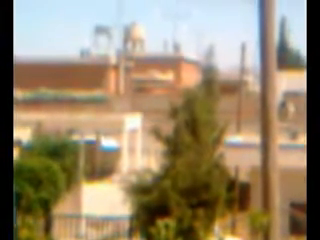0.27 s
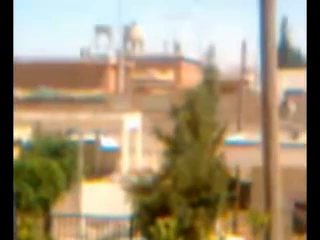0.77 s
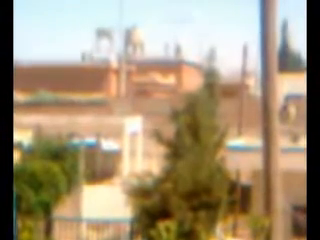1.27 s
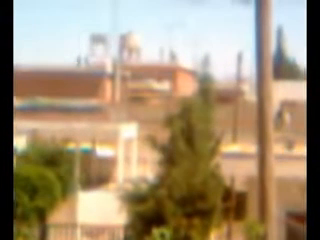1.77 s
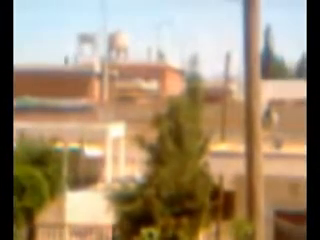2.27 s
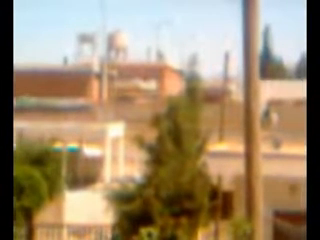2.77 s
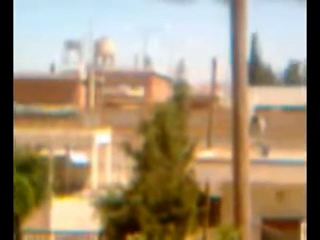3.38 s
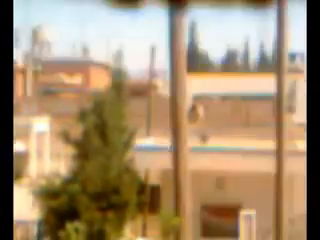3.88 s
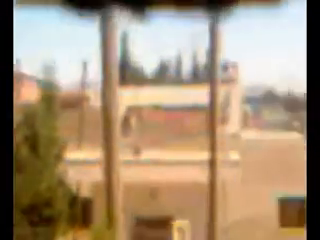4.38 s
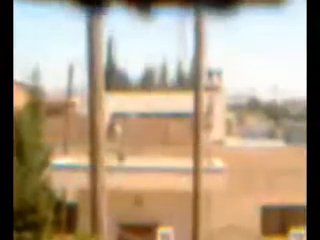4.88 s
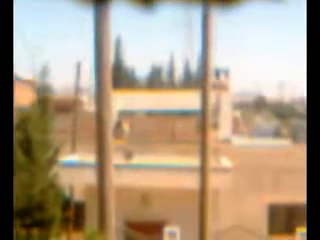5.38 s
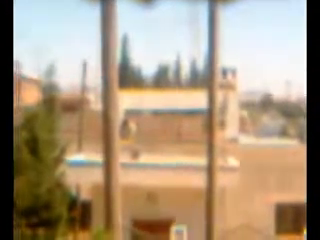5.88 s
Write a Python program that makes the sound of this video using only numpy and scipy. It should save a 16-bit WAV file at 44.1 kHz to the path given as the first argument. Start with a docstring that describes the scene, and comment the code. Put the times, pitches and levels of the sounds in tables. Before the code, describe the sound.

A long burst of rapid machine-gun fire cracks and rattles off town houses, its echo rolling away before four single rifle shots, through a phone.

```python
"""In the streets of a town, a machine gun fires one long burst; four single rifle shots follow.
Each bullet's supersonic crack is a sharp pulse that rattles off nearby houses as a swarm of reflections.
The duller muzzle report, pulses and echoes too, follows about a tenth of a second later.
The streets add a long rolling tail of decaying noise taps, over a faint steady wash of coloured noise.
A phone with a limiter and a coarse sample rate takes it all in."""
import sys
import numpy as np
from scipy import signal
from scipy.io import wavfile
from scipy.ndimage import uniform_filter1d, minimum_filter1d

SR = 44100
rng = np.random.default_rng(int(sys.argv[2]) if len(sys.argv) > 2 else 0)


def waveform_to_disk(signal):
    """Save audio, clipped to [-1, 1], as 16-bit WAV at the path in sys.argv[1]."""
    frames = np.transpose(np.atleast_2d(signal))
    scaled = np.clip(frames, -1, 1) * 32767
    samples = np.round(scaled).astype(np.int16)
    wavfile.write(sys.argv[1], SR, samples)


N = 269451

# rounds of the burst, as each bullet passes: (time [s], direct crack level before the front's boost [dB])
BURST_ROUNDS = [(0.0005, -2.5), (0.1181, -8.5), (0.2249, -6.5), (0.3238, -10), (0.4341, -11), (0.5499, -14),
                (0.6493, -6), (0.7618, -10.5), (0.8577, -9.5), (0.9611, -12), (1.0544, -7.5), (1.169, -10),
                (1.2717, -10.1), (1.3716, -12.5), (1.4819, -13.5), (1.5837, -11), (1.6896, -11.3),
                (1.81, -17), (1.9017, -14), (2.018, -14.5), (2.1195, -15.5), (2.2319, -16.5),
                (2.3472, -10.5), (2.4527, -10.5), (2.5515, -7.5), (2.6532, -9.5), (2.7605, -8.5),
                (2.8641, -7), (2.955, -3.5), (3.0562, -7.5), (3.1474, -13), (3.256, -11.5), (3.3481, -11.5),
                (3.4366, -12.5), (3.529, -9.5), (3.625, -13.5), (3.7097, -13), (3.8245, -13), (3.9395, -6),
                (4.053, -5.5), (4.1675, -9.5), (4.2867, -11), (4.4045, -14)]


def bullets(front_boost_db=4):
    """Shock wave and early reflections: a sharp front, then a longer swarm from the house fronts."""
    # closely spaced arrivals of the shock: (delay [s], level [dB])
    front_paths = [(0, -4.5), (.00087, -3.5), (.00174, -3), (.0026, -4)]
    # spectrum of the shock front: (frequency [Hz], relative level [dB])
    front_colour = [(40, -39.5), (250, -22.5), (700, -19.5), (1200, -12.5), (1800, -3), (2300, -0.5),
                    (2650, -15), (3000, -14), (3500, -32), (4000, -33.5)]
    # outline of the swarm off the houses: (delay [s], level [dB])
    echo_outline = [(.004, -4), (0.013, -3.5), (0.016, 5), (.026, 2), (.042, -5), (0.055, -9.5),
                    (.072, -14.5), (.12, -19)]
    # spectrum of that swarm: (frequency [Hz], relative level [dB])
    echo_colour = [(40, -34.5), (250, -26.5), (700, -22), (1000, -22.5), (1400, -14), (1800, -9),
                   (2150, -4), (2400, -5.5), (2700, -10), (3000, -17.5), (3500, -26), (4000, -36)]
    # level of the house echoes along the burst: (time [s], level [dB])
    house_level = [(0, -7.5), (1.45, -8.5), (1.75, -11.6), (2.3, -8.6), (3.6, -8), (4.4, -8.5)]

    passing, crack_db = np.transpose(BURST_ROUNDS)
    echo_db = np.interp(passing, *np.transpose(house_level))
    front = direct(passing, crack_db + front_boost_db, front_paths, front_colour,
                   length=.0018, jitter=.00005)
    swarm = arrivals(passing, echo_db, echo_outline, echo_colour, paths_per_s=1500, same=.3)
    return front + swarm


def muzzle():
    """Blast wave trailing the shock: clean bass bounces, scattered midrange, and far-wall echoes."""
    # lag of each report behind its crack, drifting as the aim swings: (time [s], lag [s])
    report_lag = [(0, 0.1), (.86, 0.11), (1.25, 0.097), (1.7, 0.085), (2.2, 0.076), (2.42, 0.076),
                  (2.87, 0.074), (3.06, 0.081), (3.26, .096), (3.53, 0.12), (3.95, 0.14), (4.4, 0.13)]
    # bounces of the bass thump: (delay [s], level [dB])
    thump_paths = [(0, 1), (.0068, 2), (0.0158, -5.5), (0.032, -6.5), (0.0339, -2), (0.0417, -10.5),
                   (0.052, -10.5)]
    # spectrum of the thump: (frequency [Hz], relative level [dB])
    thump_colour = [(20, -30.5), (45, -22), (85, -12.5), (150, -14.5), (215, 0.5), (285, 3.5), (370, -2.5),
                    (460, -7), (600, -17), (1200, -23.5), (2400, -33.5), (4000, -75)]
    # outline of the midrange bark's swarm: (delay [s], level [dB])
    bark_outline = [(0, 6), (.003, -3.5), (.007, 0.5), (.0095, 3), (.018, -2.5), (.034, -5), (.045, -14.5),
                    (0.068, -18.5)]
    # spectrum of the bark: (frequency [Hz], relative level [dB])
    bark_colour = [(100, -42.5), (400, -9), (600, -8), (780, -12), (1000, -1.5), (1300, -2.5), (2000, -3),
                   (2600, -17), (3200, -12), (4000, -34.5)]
    # far-wall echo level along the burst: (time [s], level [dB])
    wall_level = [(0, -24.5), (1.5, -27), (2.1, -22.5), (2.8, -21.5), (3.5, -25), (4.15, -34), (4.4, -25.5)]
    # clean, hollow thud off one broad wall: (delay [s], level against the wall level [dB])
    thud_paths = [(0.0313, -0.5)]
    # spectrum of the thud: (frequency [Hz], relative level [dB])
    thud_colour = [(100, -31.5), (200, -14.5), (275, -5), (325, 2.5), (385, -8), (520, -18), (900, -36.5),
                   (4000, -60.5)]
    # outline of the scattered far-wall swarm: (delay [s], level [dB])
    wall_outline = [(.018, -6.5), (0.03, 9.5), (0.043, -3.5), (0.057, -2), (0.081, -9.5), (.13, -20.5)]
    # spectrum of the scattered swarm: (frequency [Hz], relative level [dB])
    wall_colour = [(20, -42), (80, -11), (170, -13.5), (300, -3), (450, -6), (700, -26.5), (1100, -21),
                   (2200, -13), (3000, -30.5), (4000, -30.5)]
    usual_lag_s = 0.11
    earlier_round_s = -.101  # a bullet already gone by, whose report is still on its way
    # levels at the usual lag, and losses per second of extra lag
    thump_usual_db, thump_loss_db_per_s = -22, 101
    bark_usual_db, bark_loss_db_per_s = -14.5, 334.5
    wall_scatter_db = -2.5  # scattered echo against the wall level

    passing = np.append(earlier_round_s, np.array(BURST_ROUNDS)[:, 0])
    lag = np.interp(passing, *np.transpose(report_lag))
    heard, extra = passing + lag, lag - usual_lag_s
    thump_db = thump_usual_db - thump_loss_db_per_s * extra
    bark_db = bark_usual_db - bark_loss_db_per_s * np.maximum(extra, 0)
    wall_db = np.interp(passing, *np.transpose(wall_level))
    thump = direct(heard, thump_db, thump_paths, thump_colour, length=.009, jitter=.00015)
    bark = arrivals(heard, bark_db, bark_outline, bark_colour, paths_per_s=1400, same=0.16)
    thud = direct(heard, wall_db, thud_paths, thud_colour, length=0.016, jitter=.0007)
    scattered = arrivals(heard, wall_db + wall_scatter_db, wall_outline, wall_colour,
                         paths_per_s=680, same=.25)
    return thump + bark + thud + scattered


def rifles():
    """Echo delay and distance: near shots slap back at once, far ones patter back from distant blocks."""
    # shots close by: (time [s], direct level [dB], echo level [dB], midrange punch level [dB])
    near_shots = [(5.8065, -12, -11.5, -12), (6.0628, -14, -11.5, -23)]
    # shots farther off: (time [s], direct level [dB], echo level [dB], bright snap level [dB])
    far_shots = [(5.1388, -16, -24, -38), (5.4364, -18, -21, -21.5)]
    # first bounces of every shot: (delay [s], level [dB])
    shot_paths = [(0, -2), (.0008, -0.5), (.0016, -9.5), (.0026, 0.5), (.0034, -10), (.0042, -1.5),
                  (.0052, -5.5), (.0063, -2.5), (.0078, -14), (.0095, -2.5)]
    # outlines of the near and far swarms: (delay [s], level [dB])
    near_outline = [(.008, 7), (.014, -4), (.022, -1), (.026, -1.5), (.06, -10.5), (.08, -9.5),
                    (0.111, -16), (.22, -28)]
    far_outline = [(0.011, -2.5), (0.041, -8), (.046, -2), (.055, -11), (.085, -8.5), (.095, -7),
                   (.125, -10), (.163, -1), (.185, -9), (0.261, -15)]
    # spectra of near shots, their punch, far shots, their snap: (frequency [Hz], relative level [dB])
    near_colour = [(40, -39), (150, -18), (350, -16), (680, -16), (900, -9.5), (1250, -2.5), (1600, -1),
                   (2000, 4), (2500, -1.5), (3000, -13.5), (3500, -20), (4000, -29)]
    punch_colour = [(300, -25), (700, -10.5), (900, -1.5), (1350, 0), (1750, -6), (4000, -43)]
    far_colour = [(40, -30), (150, -12), (400, -4), (800, -4.5), (1300, 0.5), (1700, 1.5), (2150, 7),
                  (2600, -2.5), (3200, -16.5), (4000, -29.5)]
    snap_colour = [(40, -35), (1500, -21), (2500, 0), (3100, 9), (3500, -16), (4000, -23)]

    times, direct_db, echo_db, punch_db = np.transpose(near_shots)
    near = direct(times, direct_db, shot_paths, near_colour, length=0.0032, jitter=.0001)
    near += direct(times, punch_db, shot_paths, punch_colour, length=0.0021, jitter=.0001)
    near += arrivals(times, echo_db, near_outline, near_colour, paths_per_s=2600, same=.2)

    times, direct_db, echo_db, snap_db = np.transpose(far_shots)
    far = direct(times, direct_db, shot_paths, far_colour, length=0.0014, jitter=.0001)
    far += direct(times, snap_db, shot_paths, snap_colour, length=0.0016, jitter=.0001)
    far += arrivals(times, echo_db, far_outline, far_colour, paths_per_s=1100, same=.2)
    return near + far


def streets(dry_shots, build_up_s=0.036, echoes_per_s=1200, roll_db=2.0):
    """Late reverberation: scattered echoes build up, then decay in uneven waves, band by band."""
    # reverberation of the streets: (frequency [Hz], time to fall 60 dB [s], level [dB])
    street_bands = [(60, 4.3, -9), (300, 0.87, -9), (574, 1.7, -4), (1190, 2.8, -9), (2380, 1.92, -14),
                    (4100, 1.2, -8.5)]

    size = 2 * SR
    taps = rng.standard_normal(size) * (rng.random(size) < echoes_per_s / SR)
    hz, t, bands = signal.stft(taps / np.linalg.norm(taps), SR, nperseg=512)
    table = np.array(street_bands)
    t60 = read(table[:, :2], hz)[:, None]
    band_db = read(table[:, ::2], hz)[:, None]
    roll = uniform_filter1d(rng.standard_normal(len(t)), size=5)
    fade = gain_of(roll_db * roll / roll.std() - 60 * t / t60)
    fade *= 1 - np.exp(-(t / build_up_s) ** 2)
    fade /= np.sqrt(np.mean(fade ** 2, axis=1, keepdims=True))  # the band level alone sets the energy
    tail = signal.istft(bands * fade * gain_of(band_db), SR, nperseg=512)[1]
    return signal.fftconvolve(dry_shots, tail)[:N]


def air(level_db=-43):
    """Stationary filtered noise: the faint steady wash of the town."""
    # spectrum of the wash: (frequency [Hz], relative level [dB])
    air_colour = [(20, -20.5), (50, -28), (100, -17), (400, -6), (800, -17), (2100, 0), (3000, -7.5),
                  (4000, -27)]
    return gain_of(level_db) * signal.fftconvolve(rng.standard_normal(N), pulse(air_colour))[:N]


def direct(times, levels_db, paths, colour, length, jitter):
    """Specular reflection: a clean pulse and its bounces, whose timing wanders in the moving air."""
    delay, path_db = np.transpose(paths)
    wave = pulse(colour) * np.sqrt(length * SR)  # 0 dB is an RMS of 1 over this length [s]
    out = np.zeros(N)
    wander = jitter * rng.standard_normal((len(times), len(paths))) * (delay > 0)  # jitter [s]
    for s, level_db, shifts in zip(times, levels_db, wander):
        for late, bounce_db in zip(delay + shifts, path_db):
            add(out, s + late, wave * gain_of(level_db + bounce_db))
    return out


def arrivals(times, levels_db, outline, colour, paths_per_s, same):
    """Diffuse reflection: a swarm of paths; the share `same` comes off the same walls for every shot."""
    colour_scatter_db = 1.5  # each swarm takes other paths, and so another colour
    delay, outline_db = np.transpose(outline)
    t = np.arange(SR // 3) / SR
    inside = (t >= delay[0]) * (t <= delay[-1])
    strength = gain_of(np.interp(t, delay, outline_db)) * inside
    out, same = np.zeros(N), np.clip(same, 0, 1)
    standing = np.sqrt(same) * sparse_taps(len(t), paths_per_s)
    for s, level_db in zip(times, levels_db):
        varied = [(hz, band_db + colour_scatter_db * rng.standard_normal()) for hz, band_db in colour]
        wave = pulse(varied)
        taps = standing + np.sqrt(1 - same) * sparse_taps(len(t), paths_per_s)
        sound = signal.fftconvolve(taps * strength, wave)
        # the outline sets the energy, whatever taps were drawn
        gain = gain_of(level_db) * np.linalg.norm(strength) / (np.linalg.norm(sound) + 1e-9)
        add(out, s, sound * gain)
    return out


def sparse_taps(size, paths_per_s):
    """Random echo density: uneven gaps and signs; a few flat walls reflect much harder than the rest."""
    taps = np.zeros(size)
    gaps, signs, heights = rng.random((3, 2000))
    at = (np.cumsum(2 * gaps) * SR / paths_per_s).astype(int)
    values = np.sign(signs - .5) * (.5 - np.log(1 - heights))
    inside = at < size
    taps[at[inside]] = values[inside]
    return taps


def pulse(colour, size=2048):
    """Minimum phase: the causal pressure pulse, of energy 1, that has this spectral shape."""
    log_gain = np.log(gain_of(read(colour, abs(np.fft.fftfreq(size, 1 / SR)))))
    spectrum = np.exp(np.conj(signal.hilbert(log_gain)))  # phase from the log gain
    wave = np.fft.ifft(spectrum).real[:size // 2]
    return wave / np.linalg.norm(wave)


def read(points, hz):
    """Logarithmic frequency scale: values joined by straight lines over it."""
    f, value = np.transpose(points)
    return np.interp(np.log(hz + 1), np.log(f + 1), value)


def gain_of(db):
    """Level to amplitude ratio: 20 dB is a factor of ten."""
    return 10 ** (np.asarray(db) / 20)


def add(mix, s, sound):
    """Superposition: mixes a sound in at time s [s]; it may already be under way at time 0."""
    start = round(s * SR)
    sound = sound[max(0, -start):]
    part = mix[max(0, start):][:len(sound)]
    part += sound[:len(part)]


def scene(rifle_send_db=-2):
    """Linear superposition: the burst and the single shots share the same streets."""
    burst = bullets() + muzzle()
    singles = rifles()
    tail = streets(burst + gain_of(rifle_send_db) * singles)
    return (burst + singles + tail + air())[None]


def limiter(x, ceiling_db=0., size=36):
    """Peak limiting: turns the gain down for about a millisecond round each peak."""
    gain = (1 + (x / gain_of(ceiling_db)) ** 6) ** (-1 / 6)
    return x * uniform_filter1d(minimum_filter1d(gain, size), size)


def low_pass(x, hz):
    """Linear-phase filtering: a steep low-pass, centred so that it adds no delay."""
    return signal.oaconvolve(x, signal.firwin(511, hz, window=("kaiser", 9), fs=SR), "same")


def record(dry):
    """Aliasing images: coarse samples joined by straight lines mirror the cracks into the treble."""
    microphone_hz, phone_rate_hz, edge_hz = 4300, 8000, 10100
    t, ticks = np.arange(N) / SR, np.arange(0, N / SR, 1 / phone_rate_hz)
    limited = limiter(low_pass(dry[0], microphone_hz))
    samples = np.interp(ticks, t, limited)
    joined = np.interp(t, ticks, samples)
    softened = signal.sosfilt(signal.butter(5, 7500, fs=SR, output="sos"), joined)
    return low_pass(softened, edge_hz)[None]


dry = scene()
out = record(dry)
waveform_to_disk(out)
```